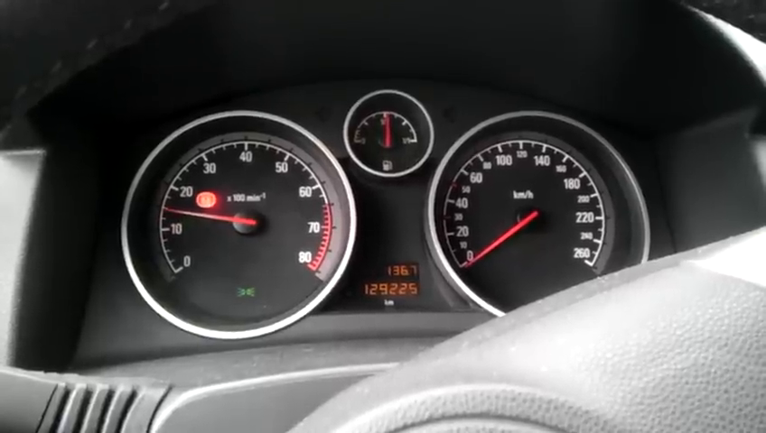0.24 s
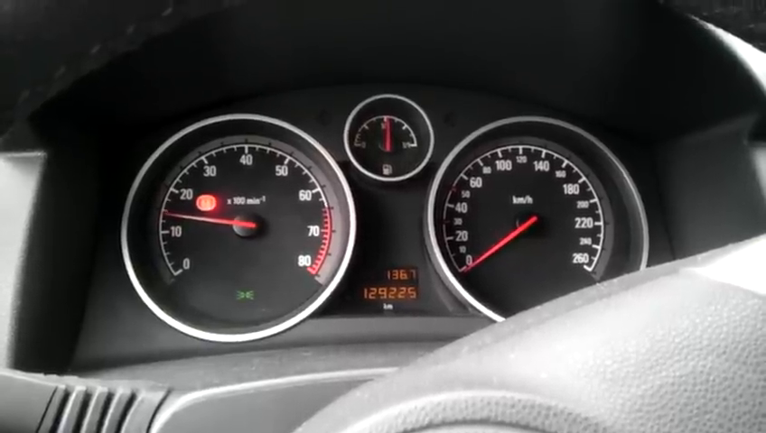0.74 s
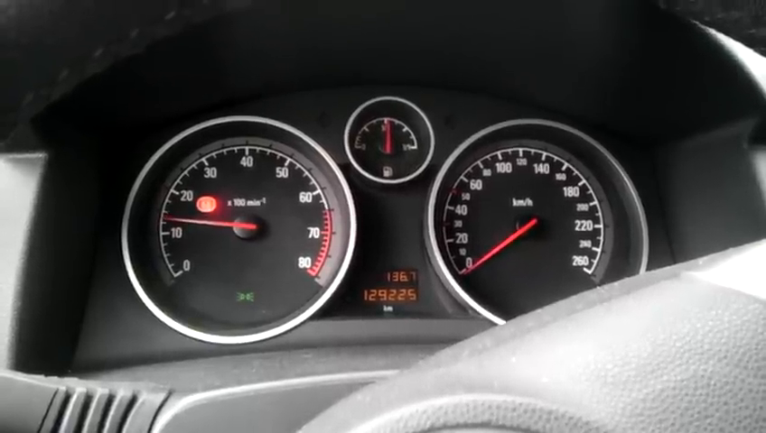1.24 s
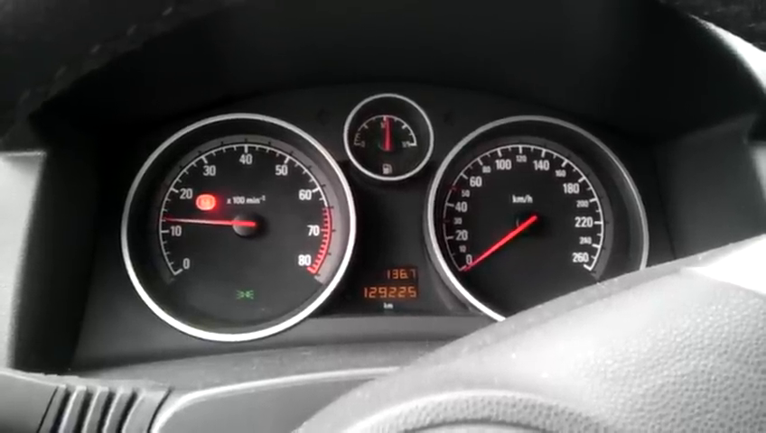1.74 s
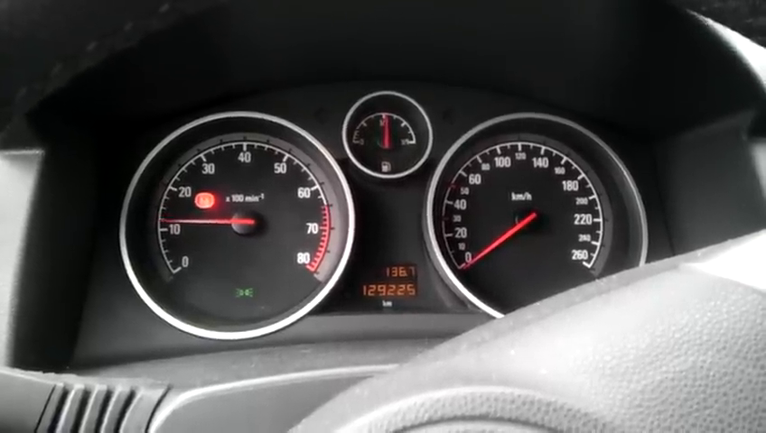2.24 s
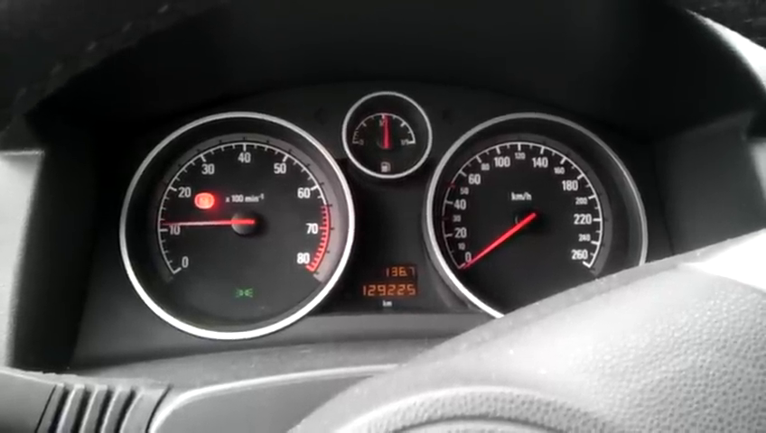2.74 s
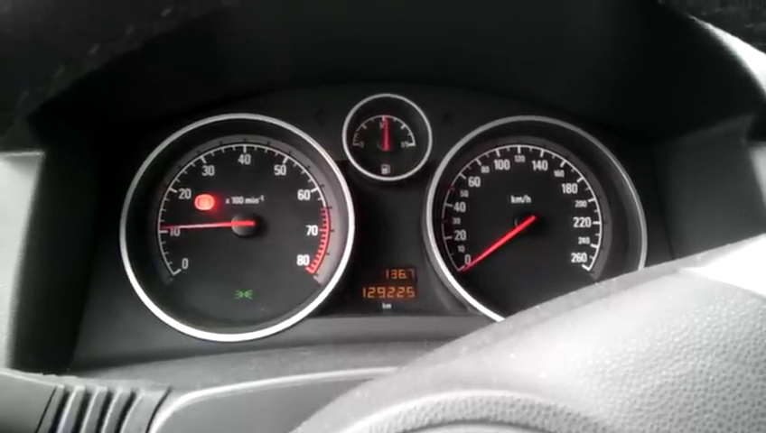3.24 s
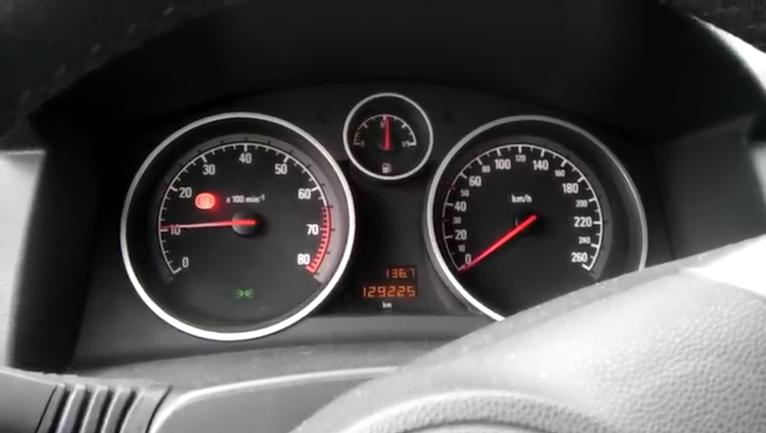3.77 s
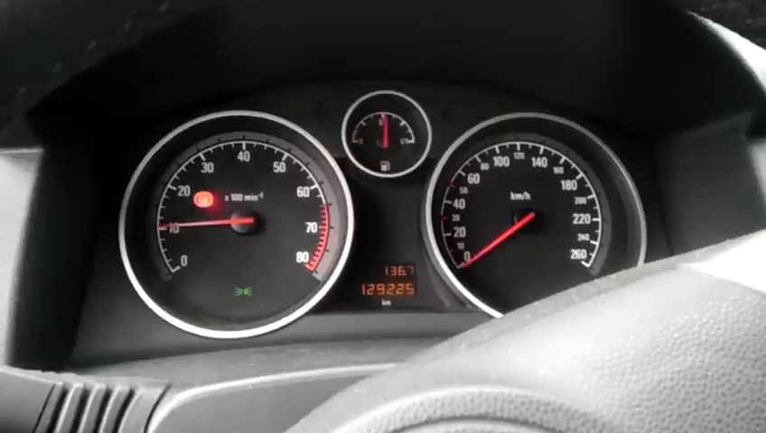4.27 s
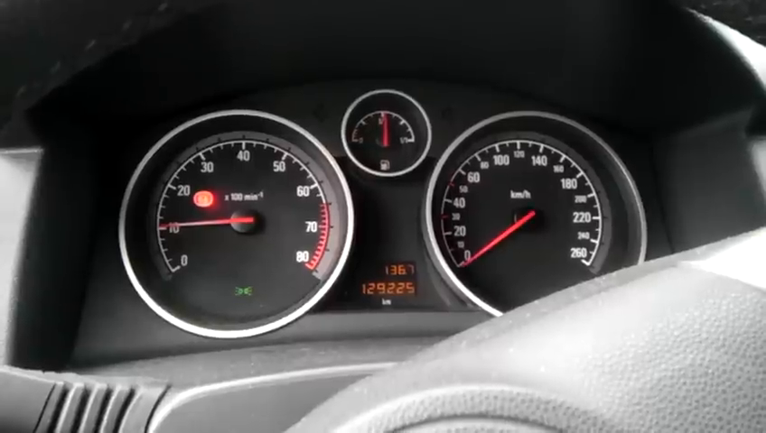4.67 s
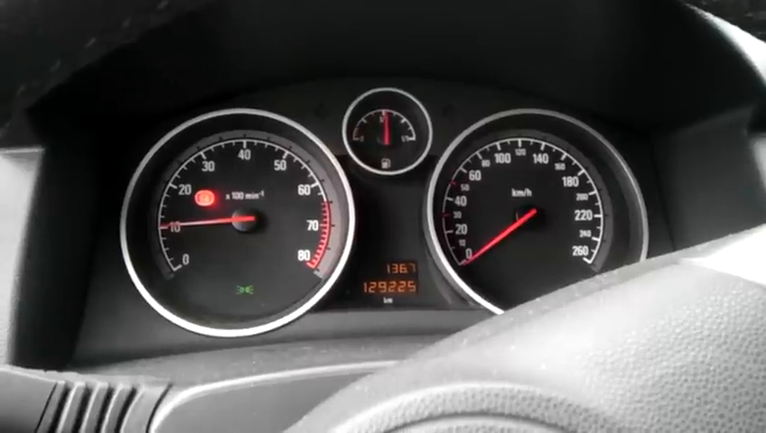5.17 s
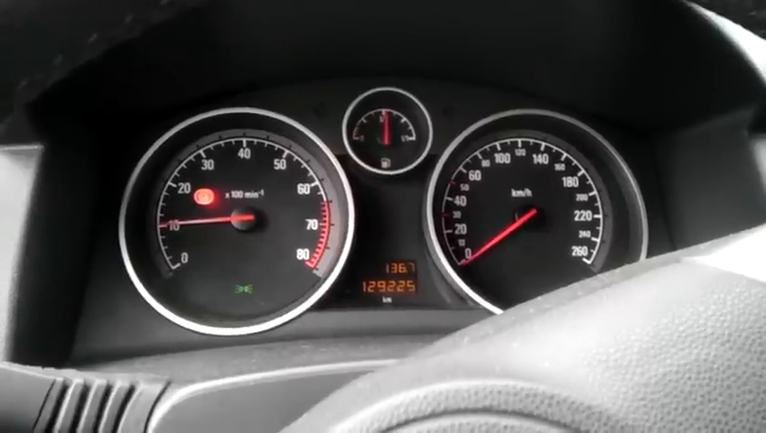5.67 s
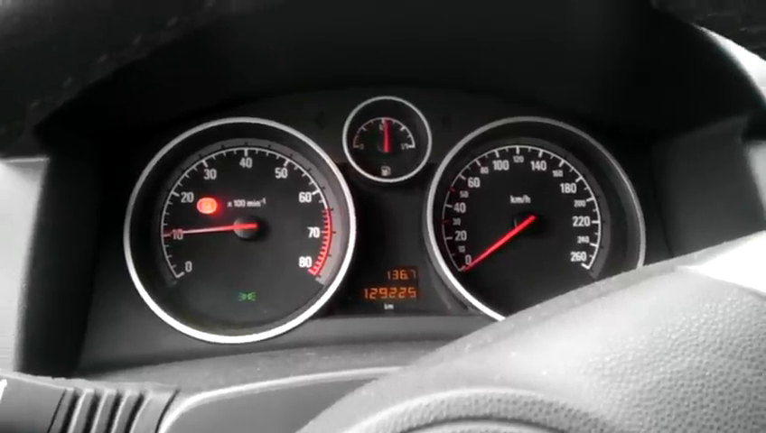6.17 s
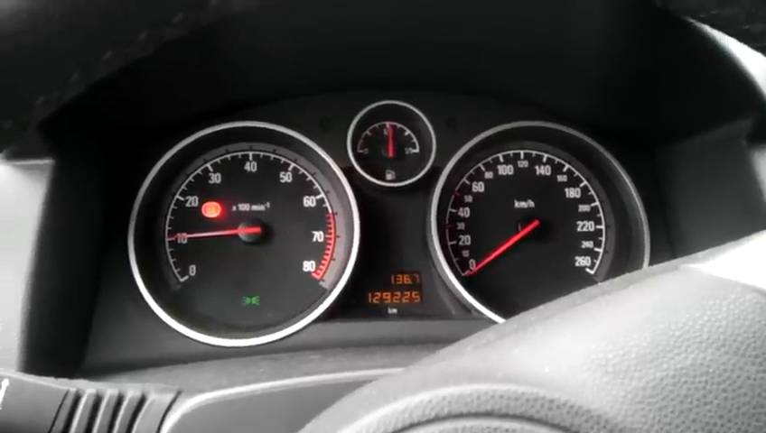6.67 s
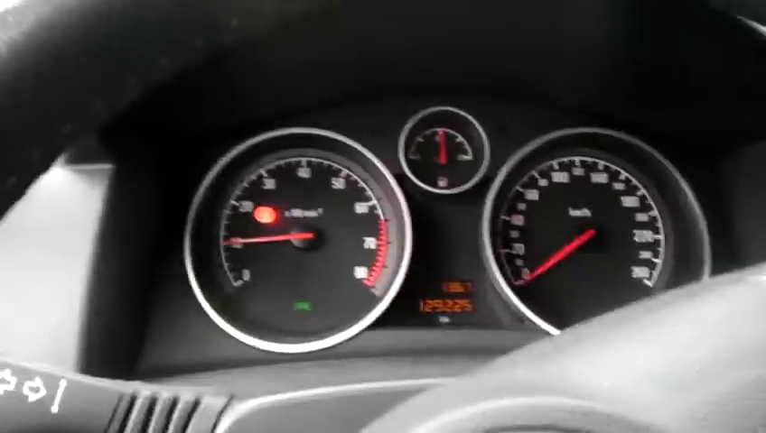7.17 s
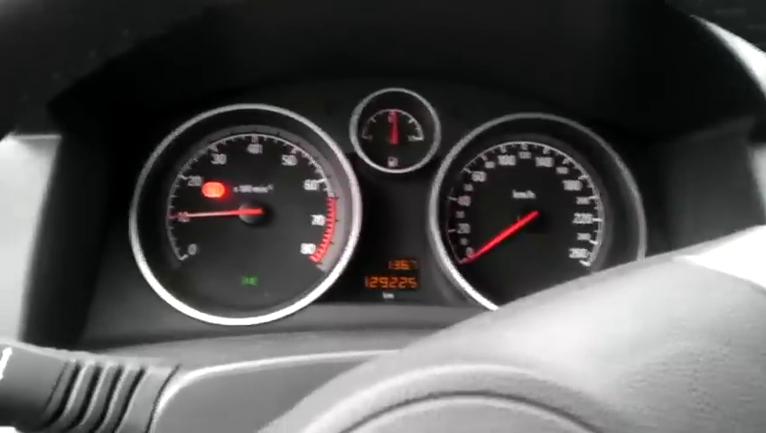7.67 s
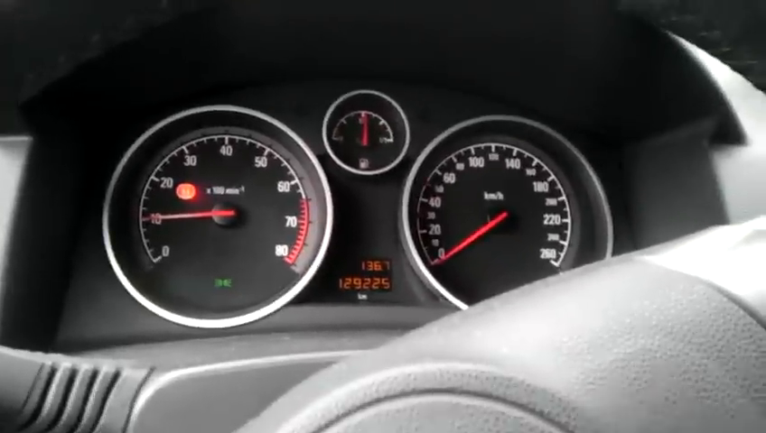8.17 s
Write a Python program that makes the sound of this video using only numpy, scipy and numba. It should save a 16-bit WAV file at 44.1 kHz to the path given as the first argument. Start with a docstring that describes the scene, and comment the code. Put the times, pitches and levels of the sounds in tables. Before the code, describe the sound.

Inside a parked car, a petrol engine's low hum eases down and steadies; birds chirp faintly, then sharp handling knocks hit the microphone.

```python
"""Inside a parked car, on the stereo microphones of a hand-held phone.
The four-cylinder petrol engine sinks from fast idle to a steady idle, booming in the cabin's
resonances over a low hum of fan and pump. Outside, small birds chirp faintly and a finch wheezes.
Right at the microphones, mostly late on, fingers rub and knock the phone's case: the hardest knocks
overload them and the gain control ducks for a moment."""
import sys
import numpy as np
from scipy import signal
from scipy.fft import rfft, irfft, next_fast_len
from scipy.io import wavfile
from scipy.ndimage import uniform_filter1d
from numba import njit

SR = 44100
rng = np.random.default_rng(int(sys.argv[2]) if len(sys.argv) > 2 else 0)


def unload_audio(sound):
    """Save the sound as a 16-bit wav file, at the path given as the first command line argument."""
    columns = np.transpose(np.atleast_2d(sound))
    # keep every value between -1 and 1, then stretch to whole-number steps
    steps = np.round(np.clip(columns, -1, 1) * 32767)
    wavfile.write(sys.argv[1], SR, steps.astype(np.int16))


N = 371322
TIME = np.arange(N) / SR

# spectrum of skin contact on the phone's case (f/Hz, relative level/dB)
CONTACT_SPECTRUM = [(50, -23), (150, 4), (300, -7.5), (520, 3.5), (800, -1), (1200, -10), (2500, -10.5),
                    (4500, -15.5), (6500, -29), (10000, -33), (12500, -34.5), (14000, -42.5)]
# where the hand is on the phone (t/s, left minus right/dB)
HAND_POSITION = [(4.5, -7), (5.7, 13.5), (6.55, 7), (6.68, -13), (7.2, -11.5), (8, 1.5)]


def engine(clatter=.069, waver_db=1.3, throb_db=1.5):
    """Crank orders swell as they slide through cabin resonances; rumble and rush pulse at each firing."""
    # low rumble and top-end rush as heard in the cabin (f/Hz, relative level/dB)
    rumble_spectrum = [(25, -46), (45, -26), (80, -21), (110, -11), (140, -1.5), (200, 0), (260, -6.5),
                       (330, -13), (450, -19), (600, -24), (820, -26), (1200, -40), (2000, -55),
                       (5000, -80)]
    rush_spectrum = [(200, 3), (400, 9), (600, 4), (850, 7), (1400, -1), (2000, -1), (2600, -0.4),
                     (3100, -4), (4400, -7.5), (5400, -15.5), (6800, -26), (8500, -16), (12800, -11.5),
                     (13800, -38)]
    # course of the rush (t/s, relative level/dB); its rise from 6.3 to 7 s is a soft rustle of the hand on the
    # phone; the rumble follows a share of its swings
    rush_levels = [(0.0, -64.5), (0.39, -64), (1.19, -64.5), (1.36, -68), (2.33, -65), (3.03, -72),
                   (3.54, -72.5), (4.03, -72), (4.68, -67), (5.18, -71.5), (5.55, -69), (6.0, -71.5),
                   (6.45, -65.5), (7.5, -69), (8.42, -70)]
    rush_db, = curves(rush_levels)
    swing_db = rush_db - rush_db.mean()
    turns = np.cumsum(crank_speed() * (1 + .0006 * walk(16))) / SR
    note = 0
    for order in range(2, 29):
        size = np.sqrt(cabin(order * crank_speed())) * undb(order_db(order) + waver_db * walk(9))
        phase = order * turns + .2 * rng.standard_normal()  # loosely in step: firings blur to a throb
        note = note + size * np.sin(2 * np.pi * phase)
    note *= undb(2.8 + np.interp(TIME, [2.9, 3.25], [0, -3.4]))  # softer at normal idle
    firing = np.cos(2 * np.pi * 2 * turns)  # two firings a turn
    rumble = noise(rumble_spectrum, N) * (1 + .25 * firing) * undb(-51.5 + .087 * swing_db)
    throb = undb(throb_db * walk(24.17))  # firings differ in strength
    rush = noise(rush_spectrum, N, alike_hz=300, alike_treble=.12) * (1 + clatter * firing)
    rush *= undb(10 + rush_db + .32 * walk(24) + .45 * walk(5))
    rush[1] = delayed(rush[1], .00038)  # it reaches the left microphone first
    return (note + rumble) * throb * pan(-1.8) + rush * pan(-.8)


def crank_speed(fast_hz=24.62, ease_hz=18.55, idle_hz=17.42, sink_s=.29, sink_hz_per_s=2.45):
    """Crankshaft turns per second: fast idle, a steady sink, then an easing to normal idle."""
    ease_s = sink_s + (fast_hz - ease_hz) / sink_hz_per_s
    sinking = np.interp(TIME, [sink_s, ease_s], [fast_hz, ease_hz])
    settling = idle_hz + (ease_hz - idle_hz) * np.exp((ease_s - TIME) / 1.35)
    return np.where(TIME < ease_s, sinking, settling)


def order_db(order, upper_db=-4, uneven_db=-21.5):
    """Strength of a crank order: firings make the even ones strong, unequal cylinders add odd ones."""
    # first harmonics of the firing rate (relative level/dB)
    firing_db = [-3.5, 3.5, 5, -2, 2.5, 2.5, -4.5, 4, -2.5]
    if order % 2:
        return -5 if order == 15 else uneven_db  # one odd order stands out
    harmonic = order // 2
    return firing_db[harmonic - 1] if harmonic <= len(firing_db) else upper_db


def cabin(hz, body_db=-71.5, bass_edge_hz=110):
    """Power that the car's body and the cabin's resonances pass at a given pitch."""
    # air and panel resonances (f/Hz, width/Hz, level/dB)
    booms = [(48.5, 8, -54.5), (88, 11, -57.5), (96, 8, -60), (118, 10, -51.5), (126, 7, -49),
             (136, 8, -48), (148, 9, -50.5), (162, 16, -45), (181, 12, -53.5), (194, 16, -47.3),
             (213.4, 9, -50.5), (227.5, 12, -49.5), (243, 15, -47.5), (272, 11, -61), (315, 24, -59.5),
             (361, 20, -58), (392, 20, -61.5)]
    body = undb(2 * body_db) / (1 + (bass_edge_hz / hz) ** 4)
    return body + sum(undb(2 * db) / (1 + ((hz - centre) / (.52 * width)) ** 2) ** 2
                      for centre, width, db in booms)


def knocks(typical_hz=393.7, typical_rise_s=.00303, crack_s=.0033, rebound_db=-14):
    """Each knock, right at the microphones, is a falling thud under a brief crack and ring."""
    # fingers striking the phone (t/s, thud level/dB, f at the peak/Hz, ring against thud/dB)
    strikes = [(5.6932, -15.5, 1093, -2.5), (5.697, 7, 702, -12), (5.729, -38, 764, -6.5),
               (6.1927, -33.5, 490, -3), (6.476, -41, 894, -24), (6.53, -31.5, 616, -21),
               (6.6947, -4, 416, -19), (6.736, -42.5, 550, -34.5), (6.941, -30, 1430, -13.5),
               (6.992, -27.5, 210, -44), (7.025, -34, 9400, -4), (7.034, -38, 8550, -6),
               (7.0392, -11.5, 293, -4), (7.0546, -13, 2800, -10.5), (7.054, -4.5, 294, -6.5),
               (7.103, -13.5, 254, -17), (7.113, -22.5, 11000, -27), (7.1132, 4, 396, -8.5),
               (8.034, -37.5, 628, -9.5)]
    out, ring = np.zeros((2, N)), case_ring()
    t = np.arange(len(ring)) / SR
    rebound = undb(rebound_db) * thud(t, hz=218, rise_s=.0025, steadiness=.24)
    for s, db, hz, ring_db in strikes:
        gain = undb(db) * pan(np.interp(s, *np.transpose(HAND_POSITION)))
        height = hz / typical_hz  # higher knocks rise faster and hold their pitch better
        rise_s = typical_rise_s / height ** .76
        thump = thud(t, hz, rise_s, steadiness=.33 * height ** 1.2)
        crack_db = min(-16 + 18 * np.log2(height), -5.5)
        crack = noise(CONTACT_SPECTRUM, len(t), tilt_db=1.5) * np.exp(-t / crack_s) * undb(crack_db)
        crack = dull(crack, 9000 * height ** .5 * undb(.39 * db))  # gentler, lower knocks are duller
        add(out, s, gain * (thump + undb(ring_db) * (ring + crack)))
        add(out, s + 1.75 * rise_s, gain * rebound)  # the phone springs back
    return out


def thud(t, hz, rise_s, steadiness):
    """A short thud that swells for one rise time while its pitch falls quickly."""
    u = t / rise_s
    cycles = hz * rise_s * (1 + steadiness) * np.log(1 + u / steadiness)
    return (u * np.exp(1 - u)) ** 3 * np.sin(2 * np.pi * cycles)


def case_ring():
    """The plastic case after a tap: a few short modes, peak 1."""
    # modes of the case (f/Hz, relative level/dB, t60/s)
    modes = [(530, -8, 0.043), (1202, 7, .022), (1454, 5, 0.017), (1640, -1, 0.019), (1987, -1, 0.026),
             (2160, -8.5, .018), (2800, -12.5, 0.037), (3700, -15, 0.0088), (9170, -36.5, 0.0068)]
    t = np.arange(int(.06 * SR)) / SR
    ring = sum(undb(db - 60 * t / t60) * np.sin(2 * np.pi * hz * t) for hz, db, t60 in modes)
    return ring / np.abs(ring).max()


def rubs(grain_db=2.5, dull_hz=4800, bright_hz=13000, pan_share=.62):
    """Skin sticks and slips on the case in short grainy strokes that stir its modes."""
    # sliding fingers (t/s, length/s, level/dB, tilt/dB per octave, ring against stroke/dB)
    strokes = [(2.815, 0.066, -60, 0, -17), (3.039, .04, -65, -3, -11), (3.158, 0.056, -63.5, 0, -14),
               (3.271, 0.042, -62.5, 0.5, -16), (3.607, 0.054, -62, 0, -14), (4.162, 0.035, -67, 3, -19),
               (5.604, 0.16, -50.5, 0.5, -9.5), (5.726, 0.014, -52, 8, -8.5), (6.191, 0.073, -38, 1, -10),
               (6.53, 0.079, -46, -8, -16.5), (6.694, 0.06, -35, -3.5, -29),
               (6.747, 0.059, -47.5, -2.5, -26.5), (6.937, 0.011, -43, -15, -5),
               (6.968, 0.13, -49.5, 1, -0.5), (7.02, 0.014, -43, 4.5, -22), (7.063, 0.083, -37.5, -2, -18),
               (7.137, 0.065, -53, 1.5, 6), (7.247, 0.036, -49.5, -2.5, 7.5), (8.042, 0.04, -52, -9, -13),
               (8.192, 0.097, -61.5, 1.5, -9.5)]
    out, grain = np.zeros((2, N)), undb(grain_db * walk(500))
    for s, length, db, tilt_db, ring_db in strokes:
        n = int(length * SR)
        # a stroke spreads over more of the case than a knock, so it sits nearer the centre
        gain = undb(db) * pan(pan_share * np.interp(s, *np.transpose(HAND_POSITION)))
        top_hz = np.interp(tilt_db, [0, 1], [dull_hz, bright_hz])
        friction = dull(noise(CONTACT_SPECTRUM, n, tilt_db), top_hz)
        stroke = unit(np.sin(np.pi * np.arange(n) / n) ** .5 * friction)
        ring = signal.fftconvolve(rng.standard_normal(n) * np.hanning(n), dull(case_ring(), dull_hz))
        add(out, s, gain * stroke)
        add(out, s, gain * undb(ring_db) * ring / ring[:n].std())
    return out * grain


def fan_and_pump():
    """Fan and pump hum and whine at their own speed, wavering a little."""
    # their tones (f/Hz, level/dB, level waver/dB, pitch wander/share)
    tones = [(47.5, -71, 2, .003), (129.3, -57, 2, .003), (649, -77, 3, .004), (718, -67, .5, .005)]
    out = 0
    for hz, db, waver_db, wander in tones:
        out = out + undb(db + waver_db * walk(7.2)) * whistle(hz * (1 + wander * walk(60)))
    return out * pan(-1.1)


def birds(attack_power=.49):
    """Small birds outside the car: gliding whistles with a quick attack, slight rasp and brief echo."""
    # whistles (t/s, length/s, f/Hz, glide/Hz, level/dB, rasp/Hz)
    chirps = [(0.036, 0.064, 3380, 398, -66, 77), (0.491, 0.075, 2830, 100, -65, 60),
              (0.67, 0.078, 3250, -60, -63, 115), (.86, .02, 3560, -450, -68, 60),
              (.865, 0.14, 3115, -400, -59, 42), (1.276, 0.031, 3300, -450, -63.5, 40),
              (1.303, 0.079, 3560, 110, -66, 85), (1.649, 0.08, 3030, 422, -63.5, 79),
              (1.867, .085, 3340, -30, -65.5, 12), (2.0, 0.14, 2870, -200, -67.5, 70),
              (2.065, 0.052, 3070, -400, -67, 50), (3.661, .1, 2740, 40, -79, 50),
              (4.06, .06, 2040, 20, -76, 12)]
    song, rasp = np.zeros((1, N)), walk(700)
    for s, length, hz, glide_hz, db, rasp_hz in chirps:
        u = np.linspace(0, 1, int(length * SR))
        pitch = hz + glide_hz * (u - .5) + rasp_hz * rasp[int(s * SR):][:len(u)]
        add(song, s, undb(db) * unit(np.sin(np.pi * u ** attack_power)) * whistle(pitch))
    return outside(song[0], t60=.3, wet_db=-4.5)


def finch(wheeze_s=4.385, buzz_hz=180, rasp_hz=130, climb_s=.47, grain_db=2.5):
    """A finch outside: a rising whistle breaks into a rough buzz of falling sweeps whose top climbs."""
    # opening whistle (t/s, f/Hz, level/dB)
    lead = [(4.222, 3550, -78), (4.24, 3930, -71), (4.265, 3900, -80), (4.3, 4000, -72), (4.34, 4420, -72),
            (4.37, 4850, -66), (4.386, 5100, -76)]
    # two voices taking turns (lowest f/Hz, sweep/Hz, widening/Hz per s, attack/s, level/dB, lag/cycles)
    voices = [(4680, 250, 4000, .17, -63.5, 0), (3870, 1100, 0, .04, -65.5, .45)]
    lead_hz, lead_db = curves(lead)
    sounding = (TIME > lead[0][0]) & (TIME < lead[-1][0])
    song = whistle(lead_hz + .5 * rasp_hz * walk(400)) * undb(lead_db) * sounding
    t = TIME - wheeze_s
    cycles = np.cumsum(buzz_hz * (1 + .09 * walk(200))) / SR  # unevenly spaced pulses
    for low_hz, sweep_hz, widening, attack_s, db, lag in voices:
        u = (cycles - lag) % 1
        span_hz = sweep_hz + widening * np.clip(t, 0, climb_s)
        hz = low_hz + span_hz * (1 - u) ** 2 + rasp_hz * walk(400)
        envelope = np.sqrt(np.interp(t, [0, attack_s, .3, .66], [0, 1, 1, 0]))
        song += envelope * np.sin(np.pi * u) * undb(db + grain_db * walk(150)) * whistle(hz)
    return outside(song, t60=.05, wet_db=-3)


def outside(x, t60, wet_db):
    """A sound from outdoors: the direct path and short reflections, different at each microphone."""
    t = np.arange(int(.3 * SR)) / SR
    tail = rng.standard_normal((2, len(t))) * undb(-60 * t / t60)
    tail /= np.sqrt(np.sum(tail ** 2) / 2)
    return x + undb(wet_db) * signal.fftconvolve(x[None], tail, axes=1)[:, :N]


def noise(spectrum, n, tilt_db=0, alike_hz=800, alike_treble=0):
    """Coloured stereo noise; the two microphones hear the same bass and less alike treble."""
    size = next_fast_len(n)
    f = np.fft.rfftfreq(size, 1 / SR) + 1
    hz, db = np.transpose(spectrum)
    gain = undb(np.interp(np.log(f), np.log(hz), db) + tilt_db * np.log2(np.clip(f, 300, 8000)))
    mid, side = rfft(rng.standard_normal((2, size)))
    alike = np.clip(np.maximum(2.3 / (1 + (f / alike_hz) ** 4), alike_treble), 0, 1)
    both = np.sqrt(1 + alike) * mid + np.sqrt(1 - alike) * side * np.array([[1], [-1]])
    return unit(irfft(both * gain, size)[:, :n])


def whistle(hz):
    """A tone of rms 1 that follows a pitch."""
    return np.sqrt(2) * np.sin(2 * np.pi * np.cumsum(hz) / SR)


def walk(rate):
    """Random levels held 1 / rate seconds and smoothed twice; spread near 1."""
    hold = int(SR / rate)
    steps = np.repeat(rng.standard_normal(N // hold + 1), hold)
    return 1.03 * uniform_filter1d(uniform_filter1d(steps, hold), hold)[:N]


def dull(x, top_hz):
    """Roll off the treble above an edge."""
    return signal.sosfilt(signal.butter(3, min(top_hz, .45 * SR), fs=SR, output="sos"), x)


def delayed(x, s):
    """A signal s seconds later."""
    return np.interp(TIME - s, TIME, x)


def undb(db):
    """Decibels to gain."""
    return 10 ** (np.asarray(db) / 20)


def unit(x):
    """Scale to rms 1."""
    return x / np.sqrt(np.mean(x ** 2))


def curves(table):
    """Each column of a timed table, sample by sample."""
    s, *columns = np.transpose(table)
    return [np.interp(TIME, s, column) for column in columns]


def pan(db):
    """Left and right gains for a level difference."""
    return undb(np.array([[db], [-db]]) / 2)


def add(out, s, x):
    """Mix a short sound in at time s."""
    i = int(s * SR)
    out[:, i:i + x.shape[-1]] += x[..., :N - i]


@njit
def follow(x, attack, release):
    """Level detector that rises fast and sinks slowly."""
    out, level = np.empty(len(x)), 0.
    for i in range(len(x)):
        level += (x[i] - level) * (attack if x[i] > level else release)
        out[i] = level
    return out


def scene():
    """From inside the cabin: engine, fan and pump, birds beyond the glass, the hand on the phone."""
    return engine() + fan_and_pump() + birds() + finch() + knocks() + rubs()


def record(dry, low_cut_hz=40, top_hz=14000, attack_s=.015, release_s=.28):
    """The phone's microphones overload and cut the bass; its gain control ducks after loud peaks."""
    overloaded = dry / (1 + dry ** 6) ** (1 / 6)
    bass_cut = signal.butter(8, low_cut_hz, "high", fs=SR, output="sos")  # rings briefly after a knock
    mics = signal.sosfilt(bass_cut, overloaded)
    excess = np.maximum(np.abs(mics).max(axis=0) - .1, 0)
    duck_db = -10 * follow(excess, 1 / (attack_s * SR), 1 / (release_s * SR))
    gain = delayed(undb(duck_db), .008)  # the control acts a moment late
    midrange = signal.sosfilt(signal.butter(1, [420, 1000], "band", fs=SR, output="sos"), mics.mean(0))
    wide = mics + .7 * delayed(midrange, .0048) * np.array([[1], [-1]])  # widens the stereo
    treble_cut = signal.ellip(8, .2, 70, top_hz, fs=SR, output="sos")
    return signal.sosfilt(treble_cut, np.clip(wide * gain, -1, 1))


dry = scene()
out = record(dry)
unload_audio(out)
```